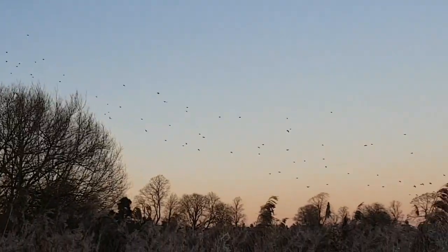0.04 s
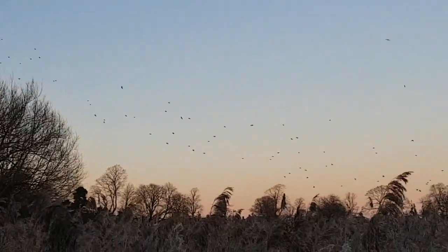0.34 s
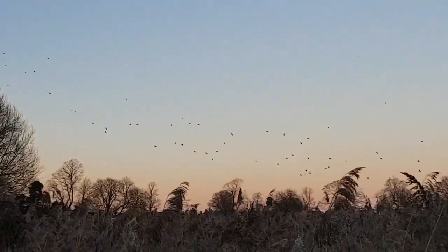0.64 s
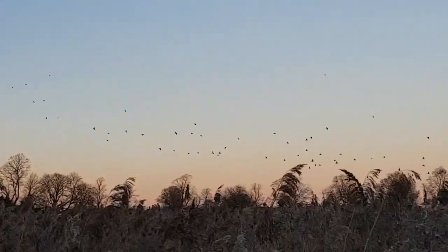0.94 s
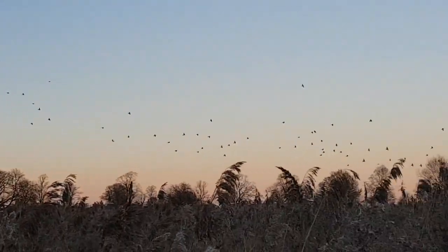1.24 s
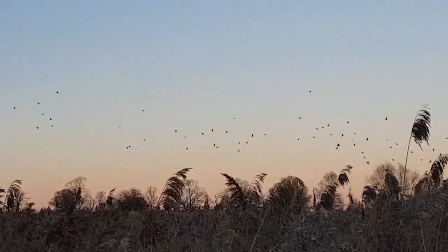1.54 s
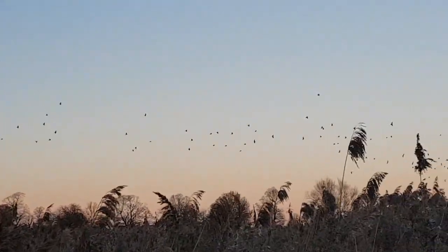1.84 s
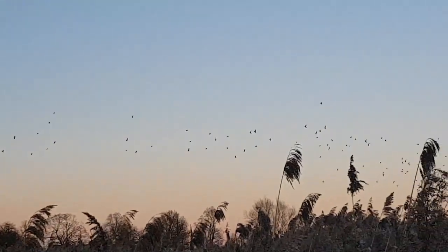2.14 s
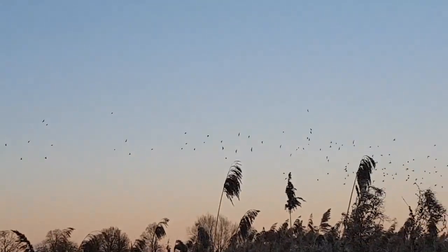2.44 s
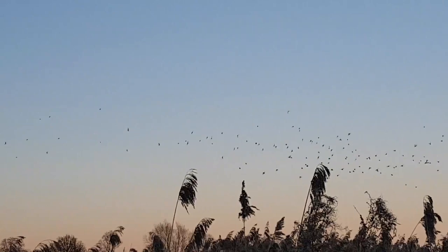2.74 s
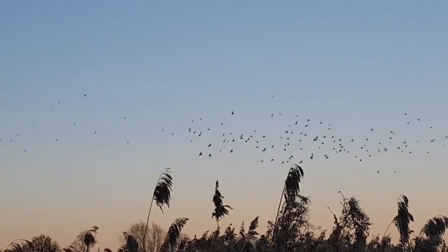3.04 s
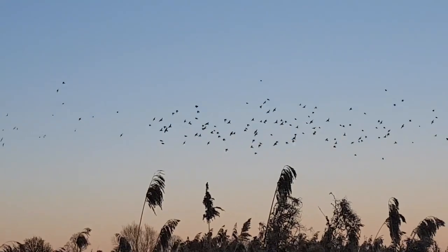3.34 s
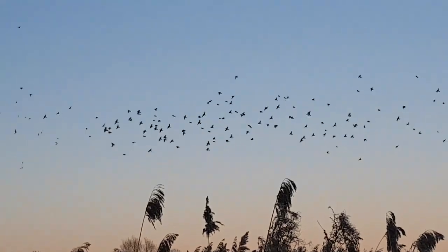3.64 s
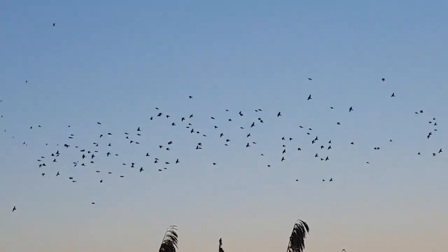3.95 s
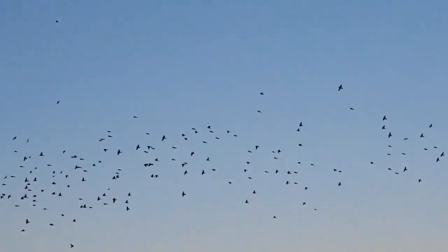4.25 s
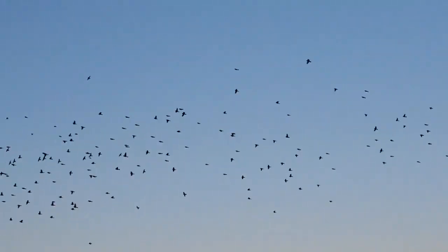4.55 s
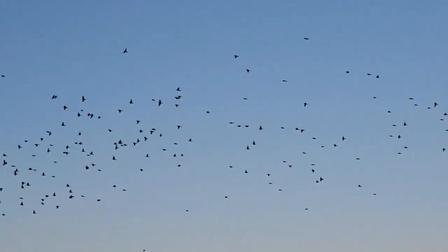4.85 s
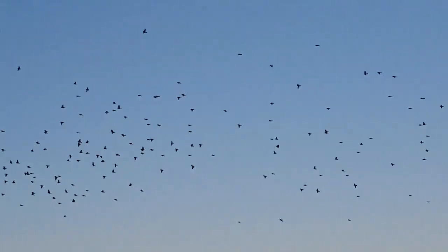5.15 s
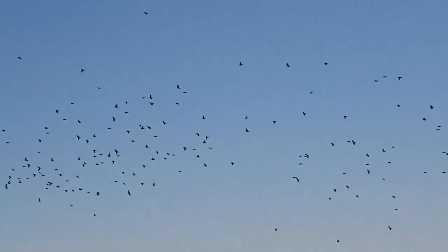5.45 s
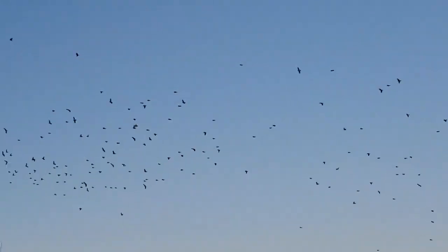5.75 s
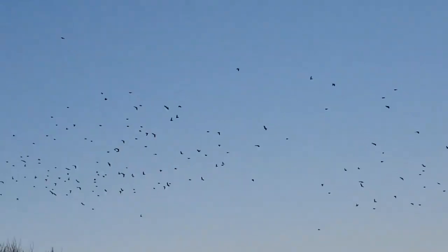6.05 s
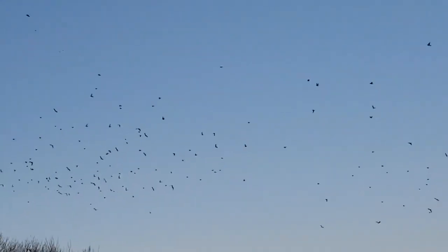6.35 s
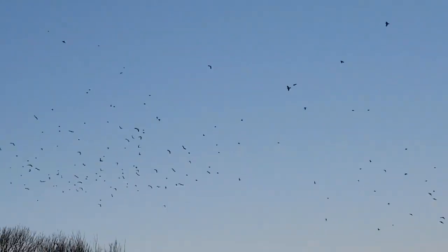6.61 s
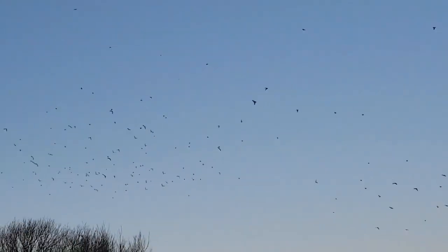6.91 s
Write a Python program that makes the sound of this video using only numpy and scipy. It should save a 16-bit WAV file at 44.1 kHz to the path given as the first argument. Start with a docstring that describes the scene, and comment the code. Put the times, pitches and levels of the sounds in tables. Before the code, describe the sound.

A distant engine drones over a low outdoor rumble, with far road traffic, faint bird chirps and light ticks of dry reeds.

```python
"""A far engine drones at its firing rate and throbs, slowing steadily, over a low rumble in a reed bed
at dusk. Tyres roar and sing faintly on a distant road, swelling and sinking in pitch by the Doppler
effect as vehicles pass. Close by, dry reed stems tick and leaves brush. One bird repeats a thin
whistle at an even pace while others chirp and rasp. Two microphone ports hear the scene in stereo."""
import sys
import numpy as np
from scipy import signal
from scipy.fft import rfft, irfft, next_fast_len
from scipy.io import wavfile
from scipy.ndimage import uniform_filter1d, map_coordinates

SR = 44100
rng = np.random.default_rng(int(sys.argv[2]) if len(sys.argv) > 2 else 0)


def waveform_to_disk(signal):
    """Save audio, clipped to [-1, 1], as 16-bit WAV at the path in sys.argv[1]."""
    frames = np.transpose(np.atleast_2d(signal))
    scaled = np.clip(frames, -1, 1) * 32767
    samples = np.round(scaled).astype(np.int16)
    wavfile.write(sys.argv[1], SR, samples)


N = 312228


def amp(db):
    """Amplitude ratio of a level in decibels."""
    return 10 ** (np.asarray(db) / 20)


def unit(x):
    """Normalisation to an rms of 1."""
    return x / np.sqrt(np.mean(x ** 2) + 1e-20)


def along(points, hz):
    """Interpolation of (frequency [Hz], value) points on a logarithmic frequency axis."""
    f, v = np.transpose(points)
    return np.interp(np.log(hz + 1), np.log(f + 1), v)


def curves(rows):
    """Linear interpolation in time: one curve for each column after the first."""
    times, *columns = np.transpose(rows)
    return [np.interp(np.arange(N) / SR, times, column) for column in columns]


def wobble(rate):
    """Smooth random modulation with `rate` knots a second."""
    knots = rng.standard_normal(int(N * rate / SR) + 4)
    return map_coordinates(knots, [np.arange(N) * rate / SR])


def filtered(x, response):
    """Linear filtering: the spectrum is multiplied by a frequency response."""
    size = next_fast_len(N + SR // 2)
    return irfft(rfft(x, size) * response(np.fft.rfftfreq(size, 1 / SR)), size)[..., :N]


def add(track, start, sound):
    """Superposition of a sound on a track from `start` seconds."""
    part = track[..., max(round(start * SR), 0):][..., :sound.shape[-1]]
    part += sound[..., :part.shape[-1]]


def rush(colour, patchy_db):
    """Partially coherent noise at two ports, alike in the bass, with drifting patches of gain; rms 1."""
    # likeness of the ports: (frequency [Hz], correlation [0-1])
    correlation = [(200, .96), (400, .9), (600, .96), (1000, .85), (1900, .78), (2400, .55), (3000, .1),
                   (5000, 0)]

    def mid_and_side(hz):
        angle = np.arccos(np.clip(along(correlation, hz), 0, 1)) / 2
        return amp(along(colour, hz)) * [np.cos(angle), np.sin(angle)]

    spectra = signal.stft(rng.standard_normal((2, N)), nperseg=512)[2]
    patches = uniform_filter1d(rng.standard_normal(spectra.shape[1:]), size=4, axis=0)
    patches = uniform_filter1d(patches, size=22, axis=1)
    pair = signal.istft(spectra * amp(patchy_db * unit(patches)), nperseg=512)[1][:, :N]
    mid, side = filtered(pair, mid_and_side)
    return unit(np.array([mid + side, mid - side]))


def engine():
    """Beating: weak lines from unequal cylinders make the firing tone throb once per engine cycle."""
    # firing tone, its level swelling and dipping unevenly: (time [s], level [dB])
    drone = [(0.0, -45.5), (0.33, -41), (0.43, -44), (1.79, -39), (2.07, -42.5), (2.66, -39), (2.98, -43),
             (3.51, -35), (3.84, -43), (3.9, -37), (4.34, -42), (4.59, -36.5), (5.03, -43), (5.07, -38),
             (5.64, -43), (5.94, -38.5), (6.43, -43), (7.08, -40)]
    # weak lines: (multiple of the cycle rate [1], level [dB])
    orders = [(4, -56.5), (5, -66), (7, -60), (8, -76.5), (9, -73.5), (14, -72.5), (24, -68.5)]
    start_hz, sag_hz_per_s, cylinders = 93.0, .45, 6
    firing_hz = start_hz - sag_hz_per_s * np.arange(N) / SR
    phase = 2 * np.pi * np.cumsum(firing_hz + .44 * wobble(7)) / SR
    firing = amp(curves(drone)[0] + .34 * wobble(12)) * unit(np.sin(phase))
    throb = np.zeros(N)
    for k, db in orders:
        gain = amp(db + 1.1 * wobble(4.8))
        throb += gain * unit(np.sin(k * phase / cylinders + .072 * k * wobble(8.3)))
    return firing + throb


def rumble():
    """Attenuation with distance: only the bass of far engines and wind carries across the marsh."""
    # strength of the rumble: (time [s], level [dB])
    levels = [(0, -55), (1.2, -47), (2.2, -45.5), (2.8, -48), (3.7, -43), (4.5, -45.5), (5.3, -44),
              (7.08, -45.5)]
    # its spectrum: (frequency [Hz], relative density [dB])
    colour = [(10, -26), (22, -19), (32, -15), (42, -1.5), (54, -6), (66, -3), (80, -4.5), (100, -7.5),
              (120, -14.5), (145, -25), (200, -31), (500, -120)]
    return amp(curves(levels)[0]) * unit(rush(colour, patchy_db=.6).mean(axis=0))


def traffic():
    """Incoherent summation: many vehicles merge into a low wash, a tyre roar and a thinner hiss."""
    # the road grows busier: (time [s], body level [dB], roar level [dB], hiss level [dB])
    levels = [(0, -58, -54, -63), (1.3, -61.5, -51.5, -63), (3.2, -59, -53, -58),
              (4.8, -57.5, -53.5, -54.5), (7.08, -52.5, -54, -56.5)]
    # spectra of vehicle bodies, tyre roar and tyre hiss: (frequency [Hz], relative density [dB])
    body_colour = [(80, -26.5), (130, 0), (180, -2), (250, 1), (340, 0), (480, -5), (620, -11), (1000, -28),
                   (2000, -120)]
    roar_colour = [(130, -28), (260, -6.5), (360, -3.5), (490, 1), (650, -1), (820, -4.5), (1000, -3.5),
                   (1200, -15), (1500, -22), (2500, -57), (5000, -120)]
    hiss_colour = [(400, -80), (800, -16), (1100, -1.5), (1320, 0.5), (1500, -1.5), (1720, -3), (1880, -2),
                   (2150, -8.5), (2400, -14.5), (2700, -22), (3500, -34.5), (8000, -87)]
    body_db, roar_db, hiss_db = curves(levels)
    bodies = amp(body_db) * rush(body_colour, patchy_db=1.67)
    roar = amp(roar_db) * rush(roar_colour, patchy_db=1.15)
    hiss = amp(hiss_db) * rush(hiss_colour, patchy_db=.5)
    return bodies + roar + hiss


def passing():
    """Spherical spreading and Doppler shift: each tyre roar swells and drops, brightest when nearest."""
    # vehicles at their nearest: (time [s], level [dB], half-width [s], centre [Hz], relative edge [dB])
    passes = [(.62, -59, 0.223, 798, 0), (1.6, -56, .5, 991, -18), (4.4, -47, .62, 800.2, -12),
              (5.65, -49.5, .7, 750.4, -22), (7.25, -44.5, .55, 801, -22)]
    # spectra of the roar and its bright edge: (frequency [Hz], relative density [dB])
    roar_colour = [(250, -68), (430, -17), (560, -5), (660, 0.5), (790, -1.5), (920, -3.5), (1080, -9),
                   (1250, -18.5), (1700, -39), (3000, -120)]
    edge_colour = [(600, -70), (950, -15.5), (1150, -1), (1350, 0), (1520, -3.5), (1750, -12), (2500, -53),
                   (5000, -120)]
    unshifted_hz, mach = 750, .03
    road = np.zeros((2, N))
    for nearest_s, db, half_s, centre_hz, edge_db in passes:
        place = (np.arange(N) / SR - nearest_s) / half_s
        nearness = 1 / np.hypot(1, place)
        heard_hz = centre_hz * (1 - mach * place * nearness)
        shift = np.exp(2j * np.pi * np.cumsum(heard_hz - unshifted_hz) / SR)
        analytic = signal.hilbert(rush(roar_colour, patchy_db=1.87), next_fast_len(N))[:, :N]
        roar = np.real(analytic * shift)
        edge = amp(edge_db) * nearness * rush(edge_colour, patchy_db=4.0)
        road += amp(db) * nearness * (roar + edge)
    return road


def tread():
    """Periodic excitation: a regular tyre tread sings a fuzzy note whose pitch settles from above."""
    # the note comes and goes: (time [s], level [dB])
    levels = [(0, -73), (1.1, -65), (1.7, -80), (3.1, -74), (3.7, -66.5), (4.6, -64.5), (5.9, -59.5),
              (7.08, -60.5)]
    # its harmonics: (harmonic number [1], relative level [dB])
    harmonics = [(1, -11), (2, -2.5), (3, -18.5)]
    settled_hz, excess_hz, settle_s = 795.5, 24.05, 2.5
    pitch = settled_hz + excess_hz * np.exp(-np.arange(N) / SR / settle_s)
    phase = 2 * np.pi * np.cumsum(pitch * (1 + .00505 * wobble(45))) / SR
    note = sum(amp(db + 2.4 * wobble(11)) * np.sin(k * phase) for k, db in harmonics)
    return amp(curves(levels)[0]) * unit(note)


def from_road(pair):
    """Time of arrival: the shorter path brings the road's sound to the left port first."""
    # bearing of the road: (time [s], lead of the left port [ms])
    bearing = [(0, .33), (2.2, .33), (3.3, .22), (4.3, .25), (5.5, .32), (7.08, .34)]
    half_lead = curves(bearing)[0] * SR / 2000
    left = map_coordinates(pair[0], [np.arange(N) + half_lead], mode="nearest")
    right = map_coordinates(pair[1], [np.arange(N) - half_lead], mode="nearest")
    return np.array([left, right])


def microphone_hiss():
    """Self-noise: the microphones add a faint broadband floor."""
    # hiss spectrum: (frequency [Hz], relative density [dB])
    colour = [(500, -2.5), (2000, 5.5), (3000, 5), (3800, 4), (4900, 2), (5600, -1), (6600, -2.5),
              (7400, -3), (8200, -4), (8900, -5.5), (10500, -4.5), (13000, -0.5), (15500, 0.6)]
    return amp(-70.5) * rush(colour, patchy_db=.36)


def breeze():
    """Uncorrelated pressure fluctuations: a light breeze stirs each port separately."""
    # wind spectrum: (frequency [Hz], relative density [dB])
    colour = [(20, -9), (55, 2), (90, -2), (130, -8.5), (250, -30), (800, -120)]
    return amp(-65.0) * unit(filtered(rng.standard_normal((2, N)), lambda hz: amp(along(colour, hz))))


def reeds():
    """Impact and friction: dry stems tick and leaves brush in two bright bands."""
    # dry stems: (time [s], upper band level [dB], lower band level [dB])
    ticks = [(.217, -74, -82), (1.393, -71, -80), (1.765, -72, -72), (2.673, -75, -78), (3.046, -71, -73),
             (3.393, -79, -66.5), (3.485, -63, -67), (3.64, -70, -66), (3.938, -66, -70), (4.285, -77, -61),
             (4.412, -70, -73), (4.788, -75, -67), (5.794, -76, -72), (6.344, -74, -67), (6.752, -82, -65)]
    # leaves: (time [s], duration [s], upper band level [dB], lower band level [dB])
    rustles = [(1.393, .035, -81.5, -87), (3.263, .07, -78, -92), (3.682, .055, -78, -78),
               (3.966, 0.06, -79, -77), (4.078, 0.12, -72.5, -67.5), (6.39, .07, -83, -75.5)]
    # the two bands, the upper coloured by the microphone: (frequency [Hz], relative density [dB])
    upper_band = [(3000, -78), (5500, -7), (6700, -8.5), (7500, -2), (8200, 1.5), (8900, -20), (12000, -32),
                  (16000, -52)]
    lower_band = [(1200, -63), (2900, -3), (3500, 4.5), (4500, -0.5), (5400, -7), (7000, -26.5),
                  (12000, -52)]
    tick_t60_s = .028
    force, t = np.zeros((2, N)), np.arange(SR // 16) / SR
    for start, upper_db, lower_db in ticks:
        add(force, start, amp([[upper_db], [lower_db]]) * amp(-60 * t / tick_t60_s))
    slips = unit(amp(1.8 * wobble(300)))
    for start, length, upper_db, lower_db in rustles:
        stroke = signal.windows.tukey(max(int(length * SR), 16), .4)
        friction = stroke * slips[int(start * SR):][:len(stroke)]
        add(force, start, amp([[upper_db], [lower_db]]) * friction)
    stirring = amp(-91.0) * unit(amp(4.3 * wobble(110)))  # the whole bed, faint and ceaseless
    upper, lower = np.hypot(force, stirring)
    crackle = upper * rush(upper_band, patchy_db=2) + lower * rush(lower_band, patchy_db=1.5)
    return crackle * amp([[-2], [2]])


def glide(length, first_hz, rise, bend, tremble, octave_db):
    """Frequency modulation: a note and its octave glide and tremble, both by shares of the pitch."""
    progress = np.linspace(0, 1, max(int(length * SR), 16))
    shake = map_coordinates(rng.standard_normal(400), [progress * length * 450], mode="mirror")
    pitch = first_hz * (1 + rise * progress ** bend) * (1 + tremble * shake)
    phase = 2 * np.pi * np.cumsum(pitch) / SR
    envelope = np.sqrt(2 * np.abs(np.sin(np.pi * progress)))
    return envelope * (np.sin(phase) + amp(octave_db) * np.sin(2 * phase))


def scatter(x, t60):
    """Multiple scattering: reeds and trees smear a sound into a decaying tail, unlike at each port."""
    t = np.arange(SR // 2) / SR
    tail = rng.standard_normal((2, len(t))) * amp(-60 * t / t60)
    return signal.fftconvolve(x[None], tail / np.linalg.norm(tail[0]), axes=1)[:, :N]


def whistling_birds():
    """Reverberation: nearly pure, slightly falling whistles linger among the trees."""
    # lower whistles: (time [s], duration [s], starting frequency [Hz], relative level [dB])
    whistles = [(2.302, .06, 3780, -72), (2.347, 0.075, 3980, -74), (2.84, .1, 3830, -74),
                (5.539, 0.13, 3980, -76)]
    # one bird keeps an even pace, a little louder each time, and skips a few beats
    first_s, period_s, peep_s, peep_hz, growth_db = .44, .536, .065, 5050, .43
    peeps = [(first_s + k * period_s, peep_s, peep_hz, -78.5 + k * growth_db)
             for k in range(13) if k not in (6, 7, 8, 11)]
    direct = np.zeros(N)
    for start, length, hz, db in whistles + peeps:
        add(direct, start, amp(db) * glide(length, hz, rise=-.024, bend=.7, tremble=.014, octave_db=-35))
    return amp(-7.0) * direct + amp(-6) * scatter(direct, t60=.83)


def reed_birds():
    """Frequency sweeps in the reeds on the right: chirps hold, then flick up; deep tremble rasps."""
    # chirps: (time [s], duration [s], starting frequency [Hz], relative level [dB])
    chirps = [(.77, .055, 4200, -75), (0.808, .028, 4530, -72), (1.584, .025, 4600, -75),
              (1.675, .04, 4400, -73), (1.779, .035, 4450, -71), (2.232, .016, 4700, -74),
              (2.927, 0.022, 4550, -73), (3.02, .03, 4350, -72), (4.01, .025, 4500, -76),
              (5.194, .012, 6500, -73)]
    # rasps: (time [s], duration [s], starting frequency [Hz], relative level [dB], octave overtone [dB])
    rasps = [(2.475, .075, 3690, -72.5, 1), (4.082, 0.086, 3980, -67.5, -4.5)]
    direct = np.zeros(N)
    for start, length, hz, db in chirps:
        add(direct, start, amp(db) * glide(length, hz, rise=.23, bend=1.8, tremble=.035, octave_db=-27))
    for start, length, hz, db, octave_db in rasps:
        rasp = glide(length, hz, rise=.04, bend=.91, tremble=.064, octave_db=octave_db)
        add(direct, start, amp(db) * rasp)
    return (amp(-4.0) * direct + amp(-9.0) * scatter(direct, t60=.27)) * amp([[-1.5], [1.5]])


def shaded(pair):
    """Acoustic shadow: the microphones' housing shades the left port above the bass."""
    # balance of the ports: (frequency [Hz], left minus right level [dB])
    balance = [(110, 0), (380, -1.5), (700, 0.5), (1290, -5), (2380, -4), (4400, -1), (8000, -2.2),
               (12000, 0.5)]
    return filtered(pair, lambda hz: amp(np.outer([1, -1], along(balance, hz)) / 2))


def scene():
    """Superposition of far machines, near life and noise at the two ports."""
    road = from_road(traffic() + passing() + tread())
    above_bass = shaded(road + microphone_hiss() + reeds() + whistling_birds() + reed_birds())
    return engine() + rumble() + breeze() + above_bass


def record(dry):
    """Band limiting: an ideal low-pass filter removes the highest treble."""
    return filtered(dry, lambda hz: hz < 15750)


dry = scene()
out = record(dry)
waveform_to_disk(out)
```